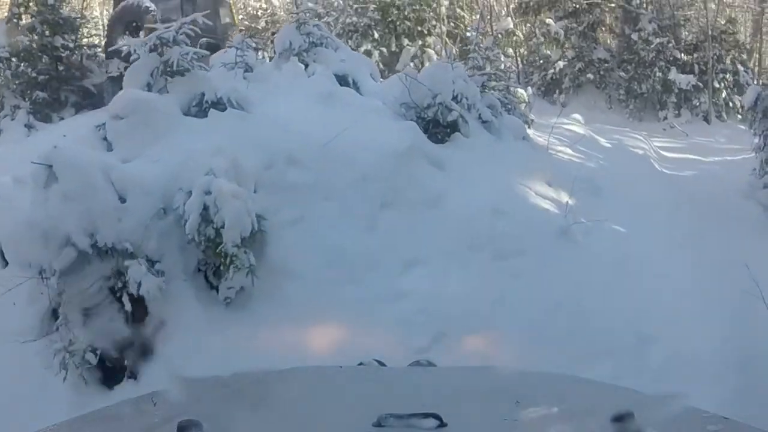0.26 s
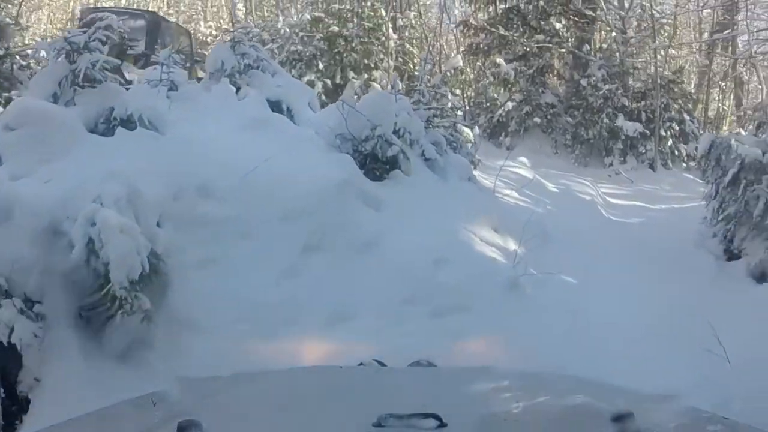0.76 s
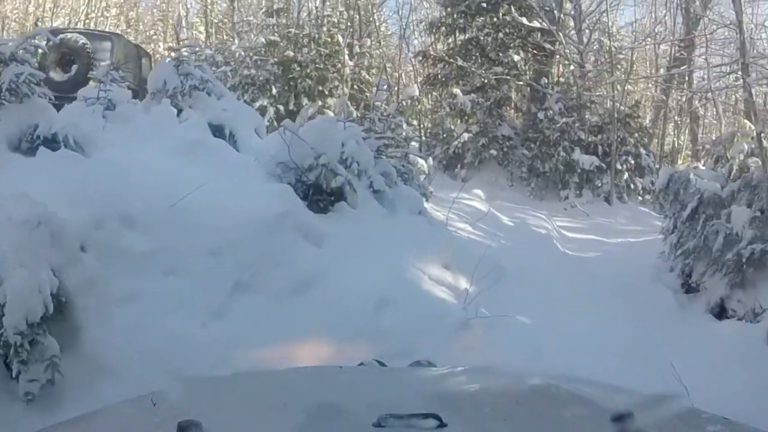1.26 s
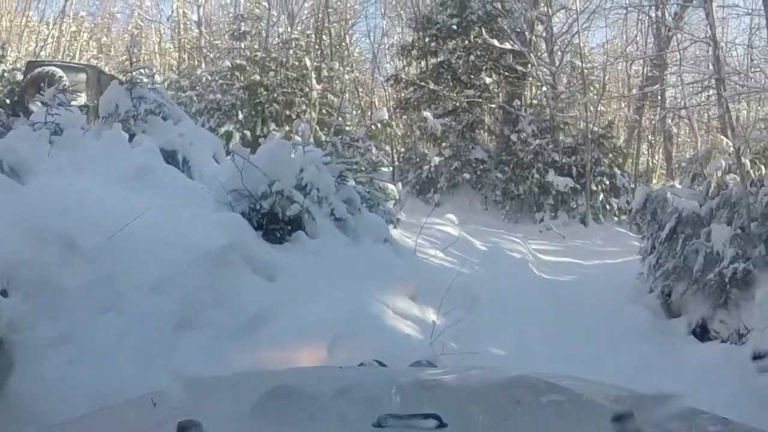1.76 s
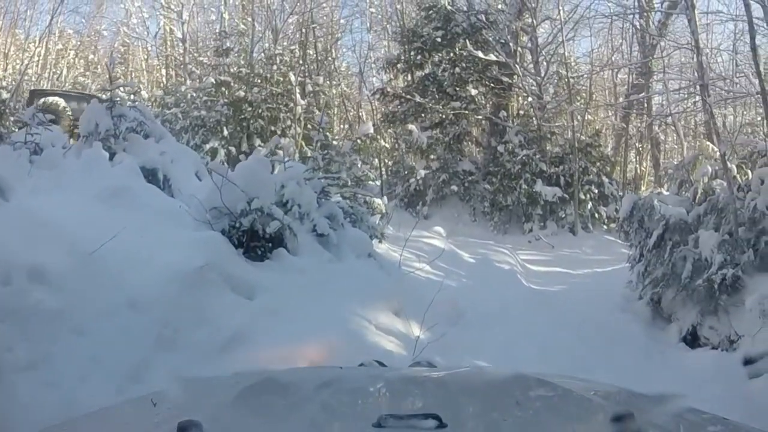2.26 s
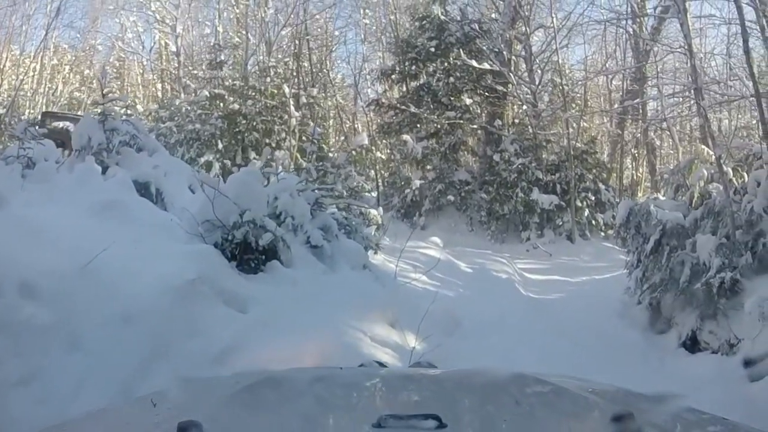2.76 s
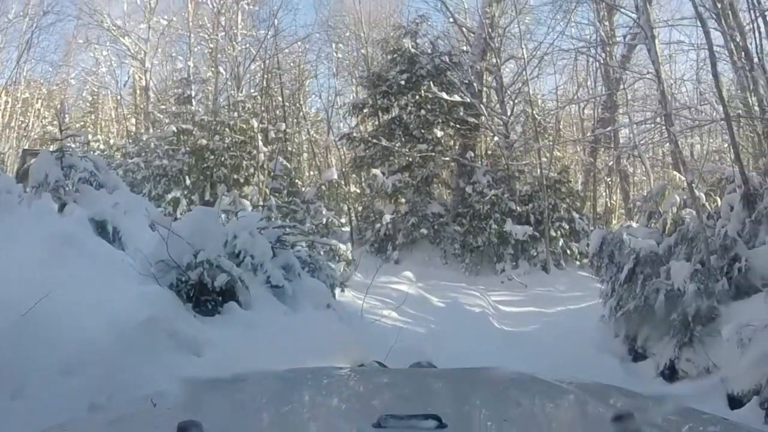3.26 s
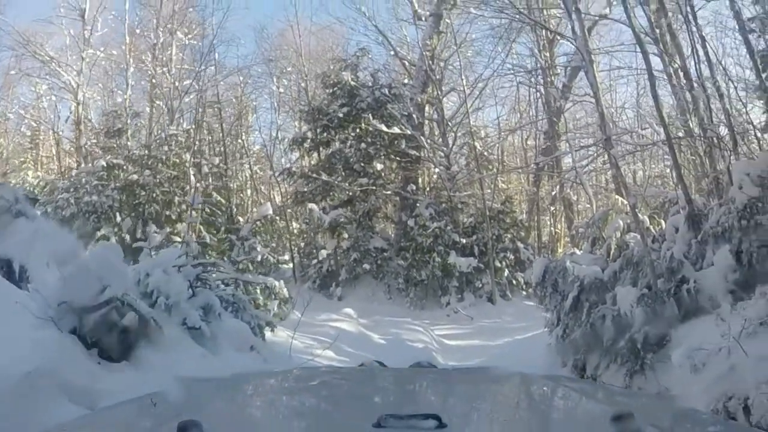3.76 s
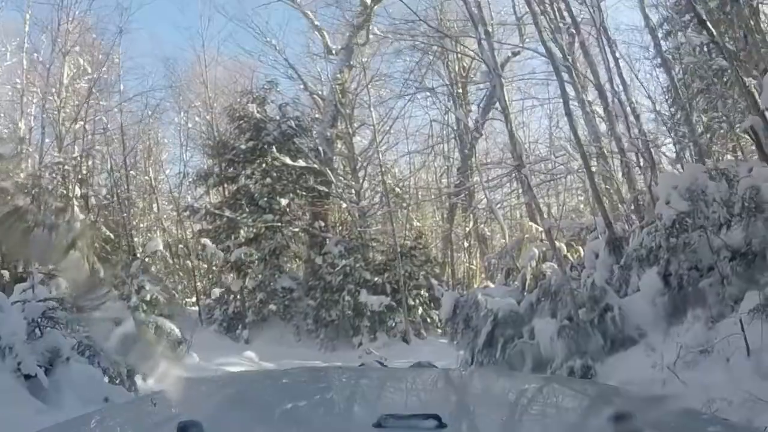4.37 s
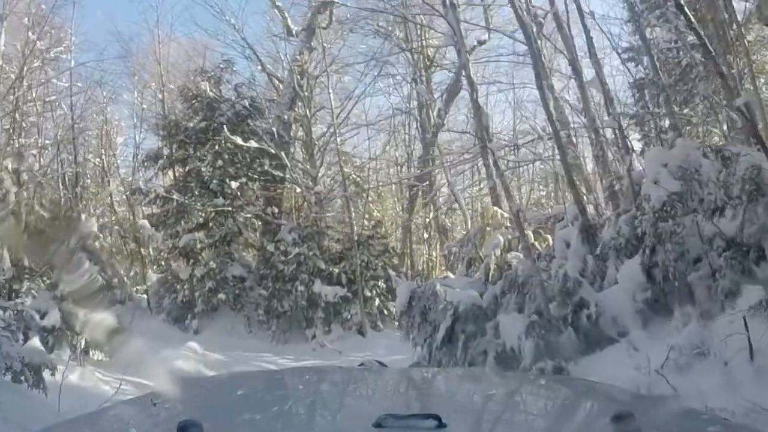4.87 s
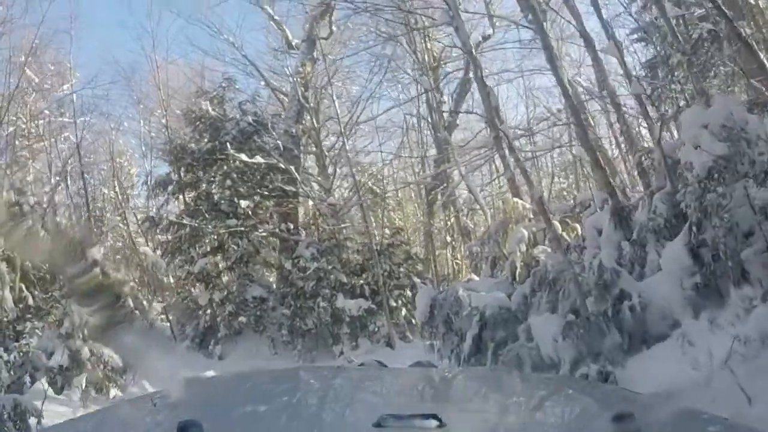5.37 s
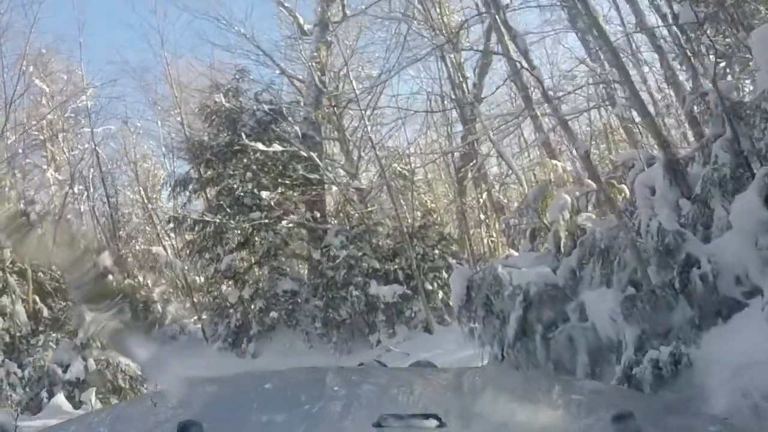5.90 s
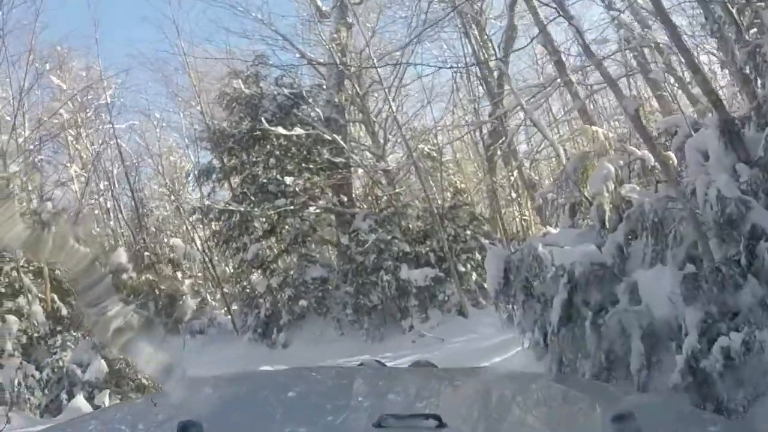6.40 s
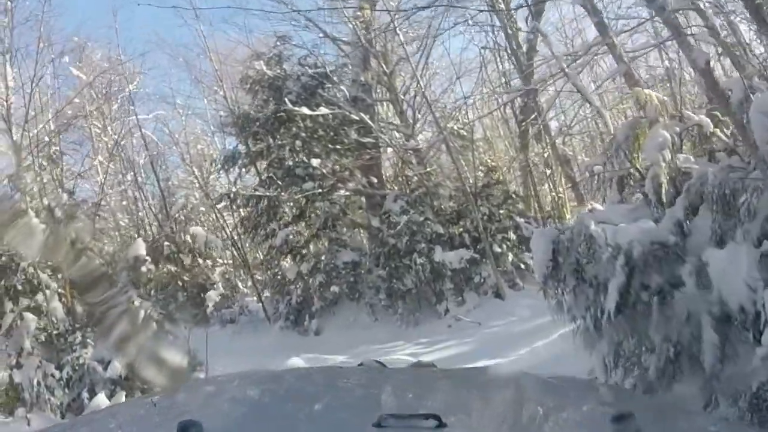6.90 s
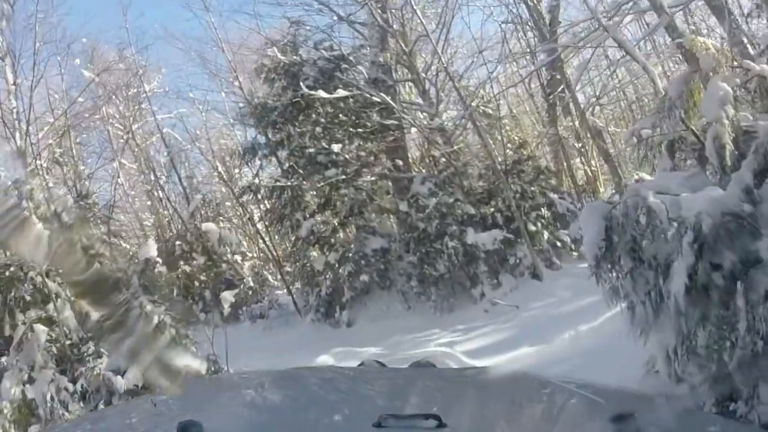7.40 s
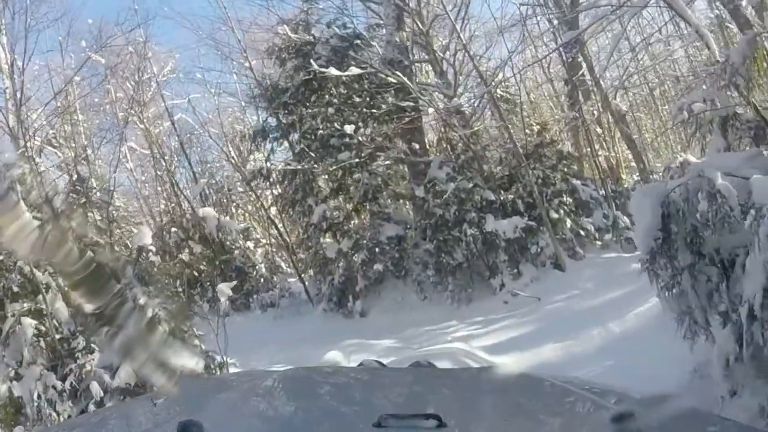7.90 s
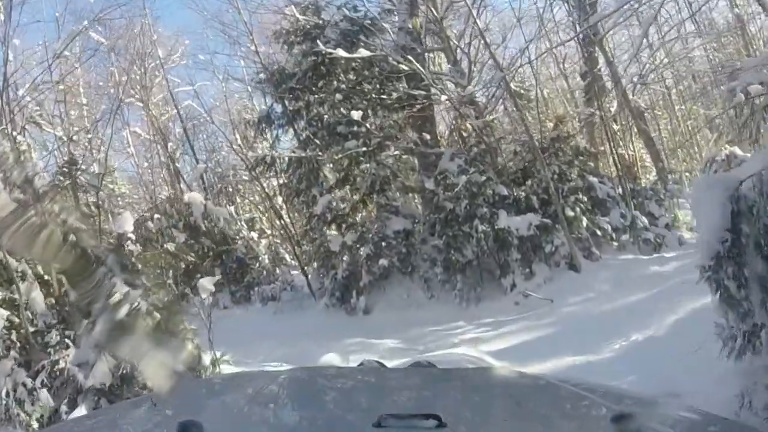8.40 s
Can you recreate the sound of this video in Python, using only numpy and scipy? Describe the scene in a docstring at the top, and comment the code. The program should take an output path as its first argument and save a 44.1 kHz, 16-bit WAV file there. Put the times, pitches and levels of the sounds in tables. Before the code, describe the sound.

Inside a vehicle crawling through deep snow in woodland, a microphone close behind the windscreen picks up a dominant low engine drone around 50 to 60 Hz, beating with cabin boom and swelling irregularly, especially near 2.6 s and 8.5 s. Tyres add deep shudders and soft, lumpy crushing beneath faint hiss and tiny trim ticks. A thin gear whine fades within the first second. From 0 to 2 s snowy twigs rasp and crunch in overlapping sweeps, with bright snaps near 0.3 and 0.8 s and knocks near 0.3, 1.2 and 1.8 s. More knocks fall near 2.3 s, then brushing nearly stops. Lighter scraping returns from 3.1 s, fullest at 4.3 to 5.1 s, with small ticks. After 5.5 s mostly rumble remains, with a slight touch at 6.5 s. Dull knocks cluster at 7.5 to 7.7 s; the hardest double thump hits at 8.45 s, with a last knock as it ends at 8.65 s.

```python
"""Snowbound woodland trail, from inside the cabin

A vehicle crawls through deep snow, heard by a sealed camera close behind the windscreen.
Wandering sines make the engine drone and cabin boom; shaped noise makes the tyres and cabin hiss.
Snowy twigs brush past as clumped noise and short grains, and snap as brief pings with a crack.
Branches knock and drag as noise bursts ringing the body, and a thin gear whine fades at the start."""
import sys
import numpy as np
from scipy.fft import rfft, irfft, next_fast_len
from scipy.io import wavfile
from scipy.ndimage import map_coordinates

SR = 44100
rng = np.random.default_rng(int(sys.argv[2]) if len(sys.argv) > 2 else 0)


def generate_wav(signal):
    """Clip the signal to [-1, 1] and save it as 16-bit WAV at the path in sys.argv[1]."""
    frames = np.transpose(np.atleast_2d(signal))
    scaled = np.clip(frames, -1, 1) * 32767
    pcm = np.round(scaled).astype(np.int16)
    wavfile.write(sys.argv[1], SR, pcm)


N = 381465  # length in samples

# Resonances of the camera housing around the microphone.
# Each row: centre in Hz, width in Hz, relative level in dB.
HOUSING_MODES = [(2434, 78, 4.5), (2753, 60, 12.5), (3080, 390, 2.5), (3395, 98, 15.5), (3777, 130, 9),
                 (4090, 250, -0.5), (4950, 79, -10.5), (5730, 80, -10), (6370, 110, -17.5),
                 (7480, 79, -15.5)]
# Resonances of the door skin. Each row: centre in Hz, width in Hz, relative level in dB.
DOOR_SKIN_MODES = [(1130, 110, -8), (1387, 24, -5.5), (1532, 23, -1.5), (1804, 97, -4), (1980, 62, -5),
                   (2250, 55, -3)]
# Resonances of the floor pan. Each row: centre in Hz, width in Hz, relative level in dB.
FLOOR_PAN_MODES = [(87, 13, -7.5), (135.6, 17, 1.5), (169, 25, -3.5), (197, 26, -6), (238.4, 22, -9.5),
                   (283, 38, -17.5), (355, 81, -22.5)]


def amp(db):
    """Amplitude of a level in dB."""
    return 10 ** (np.asarray(db) / 20)


def unit(x):
    """x scaled to an rms of one."""
    return x / np.sqrt(np.mean(x ** 2) + 1e-20)


def curves(rows):
    """One value per sample for each column after the time."""
    s, *cols = np.transpose(rows)
    return [np.interp(np.arange(N) / SR, s, c) for c in cols]


def wobble(rate):
    """A smooth random curve, rate knots a second."""
    knots = rng.standard_normal(int(N * rate / SR) + 4)
    return map_coordinates(knots, [np.arange(N) * rate / SR])


def filtered(x, response):
    """x shaped by a complex response of frequency."""
    m = next_fast_len(N + SR // 2)  # room for the ringing
    return irfft(rfft(x, m) * response(np.fft.rfftfreq(m, 1 / SR)), m)[:N]


def colour(points):
    """Gain along (Hz, dB) points on a log frequency axis."""
    f, db = np.transpose(points)
    return lambda hz: amp(np.interp(np.log(hz + 1), np.log(f + 1), db))


def modes(table):
    """Causal response of a set of resonances, scaled so that white noise keeps its rms."""
    def response(f):
        h = 0
        for k, (c, w, db) in enumerate(table):
            # neighbouring modes ring in opposite phase
            h = h + (-1) ** k * amp(db) * 1j * f * w / (c * c - f * f + 1j * f * w)
        return h / np.sqrt(np.mean(np.abs(h) ** 2))
    return response


def tone(hz, db, drift=0):
    """A sine on a pitch and rms level curve; drift is phase wander in radians."""
    return np.sqrt(2) * amp(db) * np.sin(2 * np.pi * np.cumsum(hz) / SR + drift)


def drone():
    """The firing tone beats against a cabin mode and a body mode; uneven cylinders add a faint octave."""
    # Firing tone of the engine. Each row: time in seconds, pitch in Hz, mean level in dB rms.
    engine = [(0, 59.7, -23.5), (.16, 52.85, -19.5), (.43, 52.64, -28.5), (.8, 60.46, -19),
              (.98, 56.16, -36), (1.27, 55.1, -18), (1.55, 53.16, -24), (1.71, 60.06, -19),
              (2.15, 54.49, -25.5), (2.3, 60.25, -19.5), (2.6, 52.23, -8.5), (2.82, 60.94, -30),
              (3.0, 56.53, -18.5), (3.1, 57.2, -26.5), (3.31, 54.12, -14), (3.49, 56.7, -19.5),
              (4.11, 56.03, -12), (4.45, 49.8, -28), (4.89, 55.64, -27.5), (5.3, 56, -11.5),
              (5.56, 53.7, -22), (5.71, 51.1, -14), (5.85, 50.3, -17), (6.35, 58.89, -15.5),
              (6.8, 59.84, -14), (7.25, 54.93, -25.5), (7.45, 52.58, -18), (7.78, 59.52, -13),
              (8.39, 58.48, -14.5), (8.5, 57.33, -6.5), (8.6, 52.1, -16.5), (8.65, 50.14, -13)]
    # Cabin boom shaken by the ruts. Each row: time in seconds, pitch in Hz, mean level in dB rms.
    cabin_boom = [(0, 44.1, -48), (0.21, 41.4, -34), (.6, 41.48, -50), (.82, 49.92, -20.5),
                  (1.05, 40.7, -31.5), (1.28, 40.5, -18.5), (1.45, 47.7, -27), (1.85, 40.03, -31),
                  (2.17, 46.92, -24.5), (2.46, 45.03, -16), (2.95, 41.7, -39), (3.2, 43.42, -16),
                  (3.45, 45.52, -13), (3.7, 40.74, -23), (4.1, 44.32, -31.5), (4.4, 43.41, -24.5),
                  (5.03, 43.77, -38), (5.3, 41.49, -15), (5.61, 42, -34.5), (6.1, 44.86, -24),
                  (6.5, 42.94, -16), (6.84, 46.99, -23.5), (7.07, 43.04, -14), (7.4, 47.1, -26.5),
                  (8.1, 43.18, -29), (8.24, 41, -15.5), (8.65, 44.8, -29.5)]
    hz, db = curves(engine)
    boom_hz, boom_db = curves(cabin_boom)
    firing = tone(hz, db + 2.6 * wobble(11), 0.5 * wobble(7.6))
    octave = tone(2 * hz, db - 31.5, 1.8 * wobble(10))
    boom = tone(boom_hz, boom_db + 2.7 * wobble(7.8), 0.76 * wobble(7))
    # the body on its springs
    sway = tone(np.full(N, 23.5), -33.5 + 4 * wobble(2.1), 3.4 * wobble(4.3))
    return firing + octave + boom + sway


def tyres():
    """Packed snow gives way in lumps under the wheels: a deep shudder, and ringing in the floor pan."""
    # Tyres crushing snow. Each row: time in seconds, level in dB rms.
    roll = [(0.0, -39.5), (0.21, -36.5), (0.63, -37), (0.79, -41), (1.44, -39), (1.56, -44), (4.12, -37.5),
            (4.43, -41.5), (5.28, -39), (5.76, -43.5), (7.06, -40), (7.42, -42.5), (7.66, -32), (7.85, -45),
            (8.31, -38), (8.65, -38.5)]
    # Chassis jolts over the ruts. Each row: time in seconds, relative level in dB.
    jolts = [(0, -38.5), (.85, -32.5), (1.5, -34), (2.2, -37.5), (2.31, -30.5), (2.5, -39), (3.3, -32),
             (3.9, -36), (5.06, -33.5), (5.27, -30), (5.55, -34.5), (6.5, -37), (7.4, -32), (7.52, -29),
             (8.2, -37), (8.45, -26.5), (8.65, -28.5)]
    # Spectrum of the shudder. Each row: frequency in Hz, relative level in dB per Hz.
    rumble = [(8.8, -22.5), (15, -6), (43, 2.5), (63, 9.5), (82, -3), (108, -13), (130, -15), (170, -47),
              (290, -120)]
    roll_db, = curves(roll)
    jolt_db, = curves(jolts)
    shudder = unit(filtered(rng.standard_normal(N), colour(rumble)))
    lumps = amp(1.7 * wobble(6) + 2.5 * wobble(25)) * rng.standard_normal(N)
    floor = unit(filtered(lumps, lambda hz: modes(FLOOR_PAN_MODES)(hz) / (1 + (hz / 290) ** 4)))
    return amp(jolt_db + 9.5) * shudder + amp(roll_db) * floor


def cabin():
    """Slightly unsteady hiss and engine clatter as noise, with loose trim ticking; the housing rings along."""
    # Cabin noise. Each row: time in seconds, level of the steady hiss in dB rms before its flutter.
    load = [(0.0, -49), (1.11, -53.5), (3.54, -54.5), (3.95, -51.5), (4.55, -54.5), (5.32, -52.5),
            (5.56, -55), (8.65, -52.5)]
    # Spectrum of the cabin noise. Each row: frequency in Hz, relative level in dB per Hz.
    spectrum = [(150, -30), (250, 0.5), (292, -11), (482, -15), (1070, -22), (1760, -25), (2120, -27),
                (2400, -27.5), (3690, -26.5), (4460, -33), (10200, -42), (12400, -44), (15500, -64)]
    ticks_per_s, tick_t60_s = 12, 0.012
    db, = curves(load)
    flutter = amp(db + 1.0 * wobble(25) + 0.59 * wobble(60))
    tick_decay = amp(-60 * np.arange(SR // 100) / SR / tick_t60_s)
    ticks = np.convolve(rng.random(N) < ticks_per_s / SR, tick_decay)[:N]
    hiss = unit(filtered(rng.standard_normal(N), colour(spectrum)))
    trim = filtered(ticks * rng.standard_normal(N), lambda hz: colour(spectrum)(hz) * (hz > 900))
    housing = filtered(rng.standard_normal(N), modes(HOUSING_MODES))
    return flutter * (hiss + amp(30) * trim + amp(-24.5) * housing)


def gears():
    """A thin whine that sinks and fades as the load comes off."""
    # Gear whine. Each row: time in seconds, pitch in Hz, mean level in dB rms.
    whine = [(0, 1246, -57), (.3, 1232, -63), (.6, 1228, -68), (1.1, 1222, -82)]
    hz, db = curves(whine)
    return tone(hz, db + 1.8 * wobble(15), 0.5 * wobble(20))


def sweep_gains():
    """Coarse and fine twig gains: each sweep rises, holds and dies away over a light dusting of contact."""
    # Twigs sweeping past. Each row: start of the hold in seconds, hold in seconds,
    # relative level in dB, fine noise against coarse in dB.
    sweeps = [(0, 0.33, -54.5, -5.5), (0.286, 0.11, -58.5, 3.5), (0.454, 0.25, -56, -4),
              (0.751, 0.023, -50, -2.5), (0.815, 0.11, -57, -6), (1.222, 0.13, -64.5, -12),
              (1.485, 0.023, -54, -2.5), (1.692, 0.043, -58.5, -4), (1.934, 0.085, -69, -7),
              (3.131, 0.091, -68.5, -7), (3.328, 0.0092, -62, -14), (3.531, 0.03, -67.5, 1.5),
              (3.697, 0.15, -70.5, -2.5), (3.909, .2, -61, -5), (4.114, 0.18, -65.5, -4),
              (4.312, 0.077, -58, -10), (4.453, 0.12, -56.5, -5), (4.789, 0.08, -57, -5),
              (4.911, 0.094, -58, -5), (5.257, 0.057, -66.5, -2.5), (5.38, 0.072, -66.5, 3),
              (6.465, 0.038, -67, 3)]
    attack_s, t60_s = 0.0069, 0.3
    arch_db = 1  # a sweep swells to its middle
    t = np.arange(N) / SR
    power = amp([[0], [-5]]) ** 2 * amp(-76 + 3 * wobble(30)) ** 2  # the dusting
    for s, hold, db, treble_db in sweeps:
        rise = np.clip((t - s) / attack_s + 1, 0, 1)
        arch = arch_db * np.sin(np.pi * np.clip((t - s) / hold, 0, 1))
        decay = 60 * np.maximum(t - s - hold, 0) / t60_s
        shape = rise * amp(db + arch - 4.0 - decay)
        power = power + (amp([[0], [treble_db]]) * shape) ** 2
    return np.sqrt(power)


def crunch(count=5000):
    """Crust breaking on the paint: short rings, each at its own pitch and size."""
    centre_hz, log_spread, life_cycles = 3100, 0.21, 38  # life: cycles to fall 60 dB
    when = rng.random(count)
    size = np.minimum(rng.exponential(size=count), 2.4)[:, None]
    hz = np.clip(centre_hz * np.exp(log_spread * rng.standard_normal(count)), 1500, 6000)[:, None]
    k = np.arange(800)  # samples in a ring
    decay = amp(6.5 * size - 60 * k / SR * hz / life_cycles)
    rings = decay * np.sin(2 * np.pi * hz * k / SR) * (1 - np.exp(-k / 50))
    places = (when * N).astype(int)[:, None] + k
    return unit(np.bincount(places.ravel(), rings.ravel(), N + len(k))[:N])


def twigs():
    """Needles and crusted snow flick along the glass: clumped grains that ring the housing."""
    # Spectrum of the needles. Each row: frequency in Hz, relative level in dB per Hz.
    needles = [(710, -29), (1200, 6), (1360, -8.5), (2300, -3), (3420, -1), (4330, -17), (6430, -23),
               (12800, -22), (15500, -43)]
    coarse_gain, fine_gain = sweep_gains()
    clumps_db = 2 * np.tanh(wobble(40))
    fine_clumps_db = 3 * np.tanh(wobble(45))

    def grains(lumps_db, swing_db, rate):
        return unit(rng.standard_normal(N) * amp(lumps_db + swing_db * np.tanh(wobble(rate))))

    def response(hz):
        return modes(HOUSING_MODES)(hz) + amp(-8.0) * unit(colour(needles)(hz))

    def split(hz):  # coarse flicks below, fine snow above
        return 1 / (1 + (hz / 4400) ** 12)

    def coarse_response(hz):
        return (response(hz) + amp(-13.0) * modes(DOOR_SKIN_MODES)(hz)) * split(hz)

    coarse = unit(filtered(grains(clumps_db, 3, 130), coarse_response))
    fine = unit(filtered(grains(fine_clumps_db, 6, 180), lambda hz: response(hz) * (1 - split(hz))))
    crust = amp(-1.5 + clumps_db) * crunch()
    return coarse_gain * (1.63 * coarse + crust) + fine_gain * fine


def snaps():
    """Each twig lets go with a brief ping at its own pitch and a bright crack into the upper housing modes."""
    # Single twig snaps. Each row: start in seconds, relative level in dB, pitch in Hz,
    # crack against ping in dB.
    ticks = [(0.2386, -38.5, 3070, -6.5), (0.309, -33, 3590, -21.5), (0.7638, -30, 3310, -4.5),
             (0.776, -32.5, 3590, -9.5), (0.831, -50.5, 3480, -21), (0.8592, -38.5, 3370, -10),
             (0.89, -39.5, 3540, -6.5), (0.896, -44.5, 3080, -13), (1.485, -38.5, 3430, -23.5),
             (1.7043, -43.5, 3730, -18.5), (3.1595, -44.5, 3610, -4), (3.183, -50, 3204, -14),
             (3.233, -47, 3630, -19), (3.364, -54, 3570, -3), (4.049, -49, 1860, -6.5),
             (4.298, -46.5, 3740, -17.5), (4.4738, -44, 2940, -15.5), (4.5248, -43, 2700, -17),
             (4.498, -48, 4750, -18), (4.565, -44, 1500, -13), (4.828, -48, 2830, -19),
             (4.921, -48.5, 2790, -18), (4.95, -45.5, 3490, -22.5), (5.002, -46, 3210, -25),
             (6.255, -54.5, 3422, 1)]
    cracks, pings = np.zeros(N + SR), np.zeros(N + SR)
    t = np.arange(SR // 30) / SR
    for s, db, hz, crack_db in ticks:
        start = round(s * SR)
        fade = amp(db - 60 * t / 0.029) * (1 - np.exp(-t / 0.00099))
        cracks[start:][:len(t)] += amp(crack_db) * fade * rng.standard_normal(len(t))
        drift = np.cumsum(0.036 * rng.standard_normal(len(t)))  # phase wander in radians
        pings[start:][:len(t)] += fade * np.sin(2 * np.pi * hz * t + drift)

    def crack_response(hz):
        return amp(-1.5) * modes(HOUSING_MODES[6:])(hz) + (hz > 3000) / (1 + (hz / 9000) ** 2)

    return pings[:N] + filtered(cracks[:N], crack_response)


def branches():
    """A snowy branch lands, chatters along and lets go; the spot it strikes picks the modes that ring."""
    # Branch blows. Each row: time in seconds, relative level in dB, then door skin, housing and
    # floor pan against the wing panel in dB, drag in seconds before each body's share,
    # favoured panel pitch in Hz, favoured floor pitch in Hz.
    knocks = [(0.311, -39.5, -6, -4, 9.5, 0.012, 810, 172), (0.89, -62, -2, -12, 30.5, 0.052, 810, 129),
              (1.159, -44, 4.5, 1, 2, 0.0097, 990, 200), (1.187, -46, 2.5, -4.5, 12.5, 0.022, 1098, 160),
              (1.824, -49.5, 6.5, 3, 13.5, 0.019, 430, 142), (1.867, -48, 3, 0, 15.5, 0.024, 1190, 232),
              (2.099, -65, 0, -4.5, 26.5, 0.013, 705, 240),
              (2.248, -48, -6.5, -4.5, 22, 0.0082, 808.5, 278.3),
              (2.277, -42.5, -5, -10, 14.5, 0.011, 1170, 276.5),
              (2.302, -56.5, -7, -4, 28, 0.011, 500, 251), (3.669, -68, -15, -12, 40, 0.011, 480, 257),
              (3.811, -55.5, -11, 3, 27, 0.0094, 505, 159.9), (6.506, -51, 1, -6.5, 2.5, 0.017, 1180, 200),
              (7.459, -43, -8, -13, 17.5, 0.015, 927, 201.8), (7.491, -50, -21.5, -27, 21, 0.015, 679, 167),
              (7.634, -43.5, -7, -8, 15.5, 0.032, 903, 205), (7.665, -45.5, -6, -12, 12.5, 0.024, 823, 204),
              (7.7, -45, -6, -13.5, 18.5, 0.027, 806.5, 204.5),
              (7.735, -48, 0.5, -8, 12, 0.022, 843.5, 139), (8.374, -58, -9, -15, 33.5, 0.029, 606.1, 135),
              (8.45, -31.5, 1.5, 1.5, 9, 0.017, 928.4, 169.6),
              (8.482, -30, -2, -0.5, 3.5, 0.0099, 930.4, 168.5),
              (8.508, -41, -3, -2, 19.5, 0.018, 1053, 253), (8.642, -41.5, -1, -21, 17, 0.023, 785, 200)]
    # Resonances of the wing panel. Each row: centre in Hz, width in Hz, relative level in dB.
    wing_panel = [(410, 73, 4.5), (697, 54, -3.5), (837, 51, -3.5), (930, 25, -3.5), (1048, 40, -6.5)]
    # one value each for wing panel, door skin, housing and floor pan
    drag_share = np.c_[[1.5, 1.0, 0.79, 1.8]]
    release_t60_s = np.c_[[0.06, 0.07, 0.09, 0.13]]
    landing_db = [22.7, 14, 12, 27.1]
    spot_width, spot_floor_db = 0.26, -7.5  # favoured band as a share of its pitch; the modes outside it
    out = np.zeros(N + SR)
    t = np.arange(SR // 2) / SR
    f = np.fft.rfftfreq(len(t), 1 / SR)
    soft = 1 / (1 + (f / 10500) ** 4)  # snow pads the contact
    tables = (wing_panel, DOOR_SKIN_MODES, HOUSING_MODES, FLOOR_PAN_MODES)
    bodies = np.array([modes(table)(f) * soft for table in tables])
    bodies[2] += amp(-14.0) * soft * 1j * f / (4000 + 1j * f)  # the bare crack passes through the housing

    def spot(hz):
        band = 1j * f * hz * spot_width
        return amp(spot_floor_db) + band / (hz * hz - f * f + band)

    for s, db, skin_db, case_db, thud_db, drag, panel_hz, floor_hz in knocks:
        after = np.maximum(t - drag * drag_share, 0)
        shape = (1 - np.exp(-t / 0.00054)) * amp(-6.5 - 60 * after / release_t60_s)
        slips = 1 + 8 * (rng.random(len(t)) < 250 / SR)  # the bark catches and slips
        burst = shape * slips * rng.standard_normal((4, len(t)))
        burst[:, 30] += amp(landing_db)  # the landing blow
        levels = amp(db + np.c_[[0, skin_db, case_db, thud_db]])
        gains = levels * [spot(panel_hz), spot(panel_hz) ** 0.9, f * 0 + 1, spot(floor_hz)]
        knock = irfft(np.sum(rfft(burst) * bodies * gains, 0), len(t))
        out[round((s - 0.0015) * SR):][:len(t)] += knock
    return out[:N]


def scene():
    """All the sources summed at the microphone, as one channel."""
    return (drone() + tyres() + cabin() + gears() + twigs() + snaps() + branches())[None]


def record(dry):
    """The camera dulls the top octave and keeps nothing above its band limit; the ends fade over 3 ms."""
    top_hz = 15600
    to_end = np.minimum(np.arange(N), N - 1 - np.arange(N))
    edge = np.clip(to_end / (0.003 * SR), 0, 1)
    return filtered(dry[0] * edge, lambda hz: (hz < top_hz) / (1 + (hz / 13800) ** 8))[None]


dry = scene()
out = record(dry)
generate_wav(out)
```